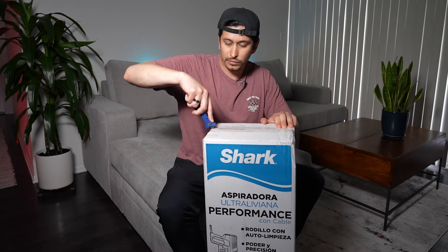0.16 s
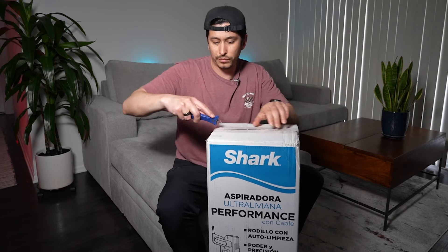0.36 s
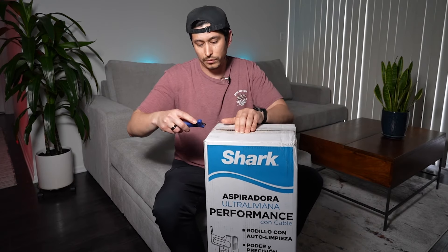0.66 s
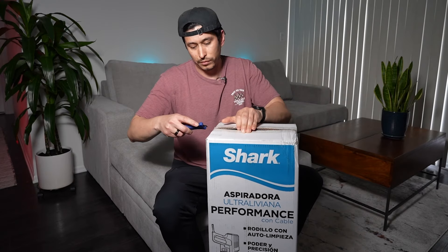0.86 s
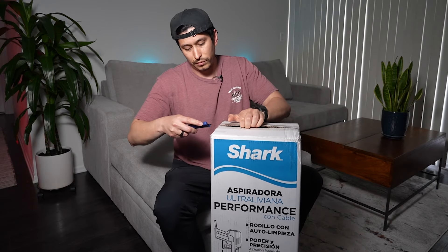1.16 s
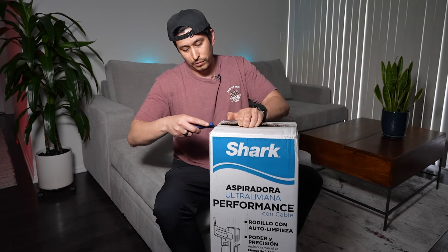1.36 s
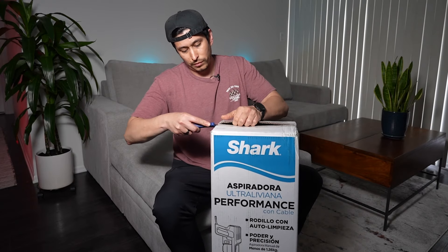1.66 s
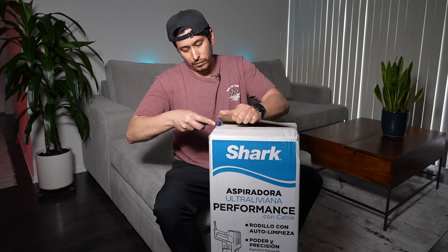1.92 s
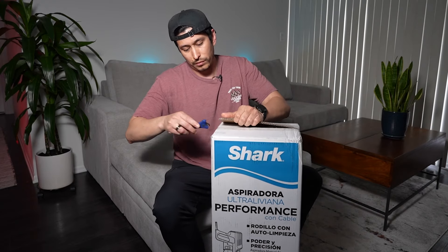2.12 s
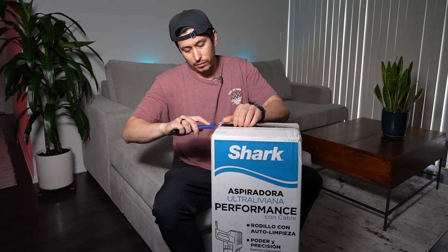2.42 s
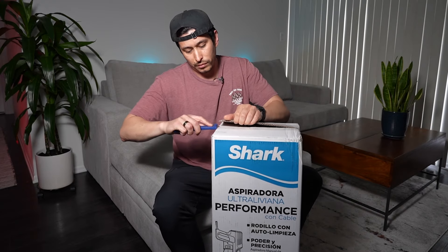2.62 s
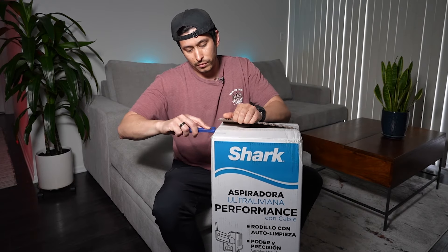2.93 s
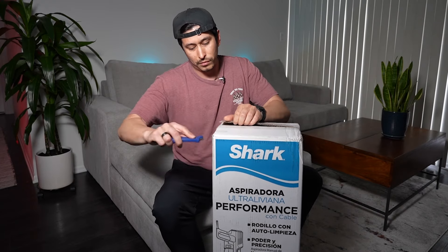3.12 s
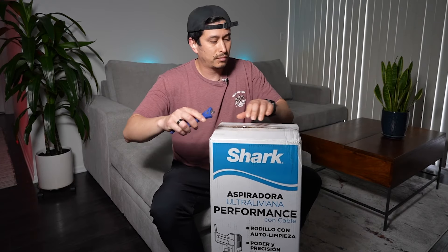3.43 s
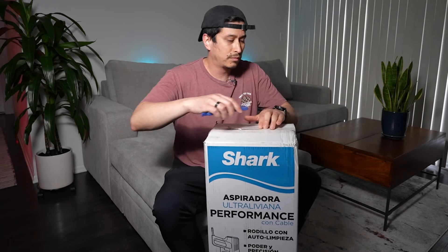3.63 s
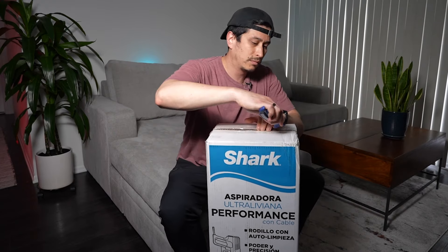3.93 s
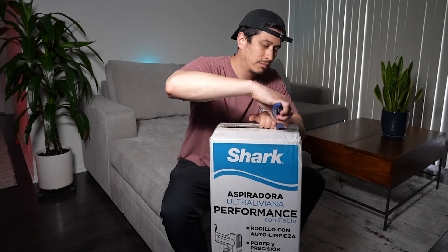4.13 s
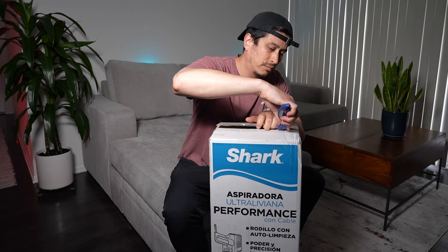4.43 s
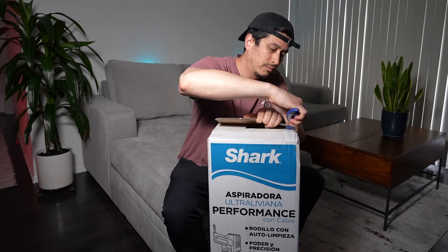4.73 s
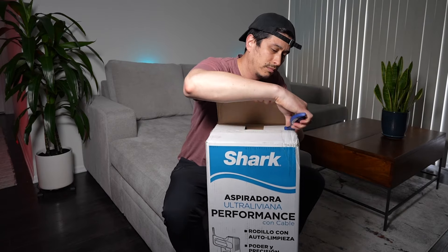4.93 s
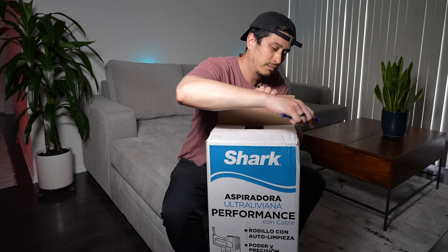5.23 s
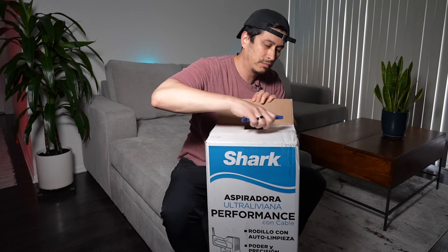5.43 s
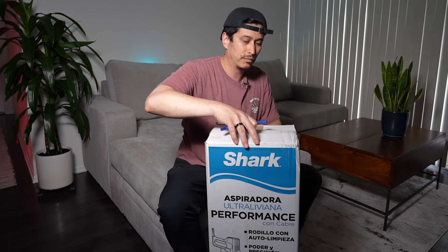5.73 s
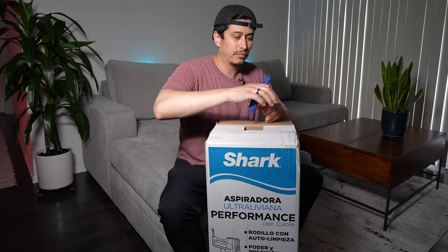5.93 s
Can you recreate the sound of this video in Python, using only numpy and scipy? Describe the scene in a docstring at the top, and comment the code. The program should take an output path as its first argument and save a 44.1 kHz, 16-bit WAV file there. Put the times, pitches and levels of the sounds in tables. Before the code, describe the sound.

Close indoor unboxing: short dry strokes of hand and blade on cardboard, tiny crisp clicks, and brief gritty tears of tape. The loudest moment is a single hard pop with a hollow panel ring early on; later come a burst of ripping with low box thuds, several hollow knocks, a second smaller pop, and finally gentle flap scuffs. The living room answers softly over a low, even background hush.

```python
"""Box cutter on a taped cardboard box

Strokes over the hollow box and short rips are stick-slip noise through board, paper and tape filters.
Blade ticks are millisecond noise bursts; knocks are decaying sines with a ring of the box.
Twice taut tape snaps: a loud crack, the ringing of the freed panel and an answer from the living room.
Diffuse reverberation and steady room tone surround it; the nearby microphone overloads softly."""
import sys
import numpy as np
from scipy import signal
from scipy.fft import rfft, irfft, next_fast_len
from scipy.io import wavfile
from scipy.ndimage import uniform_filter1d, map_coordinates

SR = 44100
rng = np.random.default_rng(int(sys.argv[2]) if len(sys.argv) > 2 else 0)


def store_wav(level_fs):
    """Save 16-bit WAV to argv[1]."""
    pcm = np.round(np.clip(np.atleast_2d(level_fs), -1, 1) * 32767)
    wavfile.write(sys.argv[1], SR, pcm.T.astype(np.int16))


N = 267687
TIME = np.arange(N) / SR  # seconds
AGE = TIME[:SR // 4]  # seconds since a contact

# strokes of blade, hand or flap over the box:
# start_s, length_s, board_level_db, paper_rasp_level_db, tape_hiss_level_db, most_rung_pitch_hz
STROKES = [(-0.02, 0.068, -43, -49.5, -54, 854), (0.263, .14, -61, -66.5, -66.5, 855),
           (0.563, 0.13, -63.5, -63, -66, 1500), (0.79, 0.088, -61, -65, -69, 1820),
           (0.884, 0.099, -53, -63, -63.5, 950), (0.998, 0.077, -51, -61.5, -70, 740),
           (1.08, 0.13, -58.5, -67, -73.5, 510), (1.2, 0.08, -67, -64, -64, 1200),
           (1.291, 0.097, -62.5, -61.5, -70.5, 1400), (1.5, 0.096, -61, -65.5, -67.5, 1650),
           (1.635, 0.11, -62.5, -64.5, -68.5, 1370), (2.08, 0.12, -64.5, -75, -74, 1460),
           (2.211, 0.18, -63.5, -67, -70.5, 1435), (2.49, 0.059, -76.5, -65.5, -74, 1607),
           (2.559, .1, -66, -76, -97, 1717), (2.787, 0.08, -53.5, -61, -68, 1980),
           (2.936, 0.27, -48.5, -55.5, -60, 810), (3.271, 0.2, -60, -74.5, -67.5, 2130),
           (3.681, 0.15, -61.5, -67, -70.5, 1670), (3.874, 0.11, -58.5, -69, -68.5, 690),
           (3.984, 0.2, -63, -65.5, -64, 1290), (4.307, .11, -61, -68, -77.5, 770),
           (4.521, .11, -57, -69, -74, 800), (4.655, 0.17, -59, -65.5, -68.5, 1760),
           (5.291, 0.12, -70.5, -80, -85, 1564), (5.455, 0.12, -68, -75.5, -74, 775),
           (5.584, 0.14, -60, -68, -65, 2000), (5.788, .11, -53, -63, -64, 1500),
           (5.933, 0.086, -65.5, -53.5, -55.5, 864)]
# short rips and scuffs: middle_s, half_length_s, board_level_db, paper_rasp_level_db, tape_hiss_level_db
RIPS = [(0.056, 0.017, -48, -58, -62), (0.089, 0.0012, -38, -40, -44.5), (.539, 0.0023, -43, -40.5, -47),
        (0.616, 0.0094, -69, -46, -54.5), (.657, 0.0011, -56, -41, -55), (.667, .001, -71, -39, -53.5),
        (2.861, 0.0044, -45, -50.5, -60), (2.977, 0.005, -33.5, -37.5, -42.5),
        (3.018, 0.0088, -29, -38, -46), (3.13, 0.022, -39.5, -49.5, -50),
        (3.144, 0.0032, -30.5, -40, -48.5), (3.422, 0.0021, -31.5, -33, -39.5),
        (3.715, .013, -41, -58, -66.5), (4.47, 0.006, -48.5, -60, -56.5), (4.568, 0.004, -72, -55.5, -56),
        (4.737, 0.0031, -55, -50, -58), (4.79, 0.0056, -57, -50, -58), (4.928, 0.0059, -52, -47.5, -53)]
# tape snaps: start_s, crack_gain_db, crack_t60_s, board_delay_s, panel_bass_limit_hz, echo_level_db
SNAPS = [(1.82, -12, 0.0065, .0006, 245.8, -33), (4.9464, -21.5, 0.0069, .0005, 160.2, -33)]
# modes of the panel freed by the first snap, then by the second: pitch_hz, level_db, t60_s
FIRST_PANEL = [(251, -17, 0.0095), (518.4, -0.5, 0.0093), (746, -12, 0.01305), (1250, -15, 0.0076),
               (1610, -10, 0.0065), (2500, -21.5, 0.01)]
SECOND_PANEL = [(200, -8, 0.015), (555, 1, 0.0089), (700, -8, 0.018), (1140, -6, 0.0073),
                (1674, -6.5, 0.011), (2060, -12, 0.01), (2710, -15, 0.0078), (3250, -14, 0.0076)]
# colour that the first snap, then the second, throws into the room: frequency_hz, gain_db
FIRST_ECHO = [(60, -11), (130, -11), (200, -3), (400, -0.5), (650, -3.5), (1000, -10), (2000, -22),
              (4300, -27.5), (6500, -24.5), (10000, -27.5), (16000, -36.5)]
SECOND_ECHO = [(60, -4.5), (120, -10), (190, 1), (280, -2), (680, -3), (880, -12.5), (1200, -8.5),
               (1700, -8), (2300, -21), (4300, -31.5), (7000, -26.5), (15000, -29.5)]
# knocks on the box: start_s, peak_level_db, most_rung_pitch_hz
KNOCKS = [(0.093, -37, 160), (0.533, -38.5, 152), (0.806, -34, 820), (.926, -38.5, 417), (1.052, -34, 357),
          (1.533, -45.5, 254), (1.615, -42, 820), (2.127, -49, 229), (2.275, -40.5, 1010),
          (2.374, -39, 887), (3.14, -28, 230), (3.637, -41, 758), (3.702, -28, 305), (3.726, -23, 610),
          (3.793, -36, 590), (3.884, -40, 342), (4.309, -41.5, 329), (4.341, -44, 190), (4.515, -37, 358),
          (4.542, -42.5, 307), (4.576, -35, 300), (4.675, -31.5, 780), (5.628, -47, 882),
          (5.696, -41.5, 279), (5.816, -42.5, 590), (5.876, -42, 1470), (2.242, -49.5, 300)]
# the box rocks and its walls flex: start_s, level_db, pitch_hz, t60_s
BUMPS = [(3.016, -30, 85.5, 0.085), (3.141, -32.5, 66, 0.077), (3.423, -28.5, 54, 0.11)]
# sharp ticks of blade and tape: start_s, crack_peak_level_db, handle_relative_to_crack_db
TICKS = [(0.0167, -25, -29), (0.039, -21.5, -35), (0.5871, -38, 1.5), (0.8067, -37, -1),
         (1.525, -40.5, -31), (2.226, -41, -8), (2.2767, -33.5, -11), (2.376, -31, -0.5),
         (2.5802, -39, -0.5), (2.6224, -36, -30), (2.6604, -37.5, -37), (2.7955, -49, 1), (2.94, -37, -25),
         (2.957, -34, -21), (3.0074, -37, 7), (3.0191, -19.5, -21), (3.108, -29, -23), (3.3308, -38.5, -25),
         (3.4105, -20.5, -27), (3.8124, -40.5, -4), (3.9451, -48.5, 9), (4.3386, -45.5, -25),
         (4.3934, -31, -25), (4.4874, -32.5, -25), (4.7518, -39, -19), (4.803, -32.5, -23),
         (4.851, -41, -2), (5.351, -51, 3)]
# resonances of the hollow box: pitch_hz, width_hz, gain_db
BOX_MODES = [(94.44, 110, 0.5), (222, 115, 4.5), (349, 130, 3.5), (487, 61, 4), (615.4, 155, 0.5),
             (786, 150, -0.5), (960, 120, -14)]
# resonances of the plastic cutter handle: pitch_hz, width_hz, gain_db
HANDLE_MODES = [(1130, 1300, 3), (1683, 1500, -3.5), (2600, 110, -12), (3260, 480, -13)]
# colour of the rasping paper face: frequency_hz, gain_db
PAPER_COLOUR = [(500, -35.5), (800, 3.5), (1050, 0), (1600, -6), (2100, -7), (3000, -12.5), (4200, -25),
                (7000, -45.5)]
# colour of tape hiss in a rip: frequency_hz, gain_db
RIP_HISS_COLOUR = [(2000, -44), (4300, -11.5), (6000, -8.5), (8200, -4.5), (10500, -8.5), (13000, -18),
                   (16000, -30)]
# colour of skin over smooth tape: frequency_hz, gain_db
SWISH_COLOUR = [(2500, -30.5), (4300, -9.5), (6500, 1.5), (9000, 0), (12000, -2.5), (15500, -6.5)]
# colour of sharp contacts: frequency_hz, gain_db
CRACK_COLOUR = [(500, -25), (2800, -2.5), (4400, -11), (6100, 3), (8300, 8.5), (11000, 2), (16000, -5)]
# decay of the room: frequency_hz, t60_s
ROOM_DECAY = [(100, .55), (400, 0.57), (1500, 0.63), (4000, 0.61), (8000, 0.55), (15000, 0.3)]
# colour of the echo from the walls: frequency_hz, gain_db
WALL_COLOUR = [(60, -4.5), (200, -1), (500, -4.5), (1500, -6.5), (4000, -5), (8000, -8), (15000, -9)]
# colour of the room tone: frequency_hz, gain_db
AIR_COLOUR = [(20, -2.5), (60, -4), (200, -17.5), (600, -16), (1500, -20.5), (3000, -28), (8000, -31.5),
              (16000, -41)]

ATTACK_S, RELEASE_T60_S = 0.03, 0.092  # pressure builds up, then the hand lifts off
WAVER_DB, WAVER_PER_S = 2.5, 30  # uneven pressure: scatter, random knots a second
SPOT_SHARPNESS, SPOT_DB = 6.7, 1.5  # rubbed patch of board: pitch over width, level against the plain rasp
CRACKLES_PER_S, CRACKLE_RANGE_DB = 19, (6, 23.5)  # tape crinkles: mean rate, peak over the hiss rms
KNOCK_CYCLES = 15  # cycles until a knocked spot has fallen by 60 dB
ROOM_DB, RIP_ROOM_DB = -13, -11.5  # room level of handling, and of rips, which face away from the microphone
TOP_HZ = 16000  # upper band limit


def sliding():
    """Stick-slip friction: fibres catch and let go, driving the box, its paper face and the finer tape."""
    rub = slips(rate=300, spread_db=5, smooth=0.5)
    glide = slips(rate=2300, spread_db=6, smooth=1.3)
    board = unit(resonate(rub, BOX_MODES))
    paper = unit(coloured(rub + glide, PAPER_COLOUR))
    tape = unit(coloured(glide, SWISH_COLOUR)) + crinkle()
    out = np.zeros(N)
    for start, length, board_db, paper_db, tape_db, hz in STROKES:
        force = pressure(length)
        first = round(start * SR)
        now = (first + np.arange(len(force))) % N
        spot = unit(resonate(rub[now], [(hz, hz / SPOT_SHARPNESS, 0)]))
        rasp = unit(paper[now] + amp(SPOT_DB) * spot)
        surfaces = amp(board_db) * board[now] + amp(paper_db) * rasp + amp(tape_db) * tape[now]
        stroke = force * surfaces
        add(out, start, stroke[max(-first, 0):])  # skip what precedes time zero
    return out


def pressure(length):
    """Friction grows with normal force: the hand presses down, holds unevenly and lifts off."""
    age = TIME[:SR // 2]
    rise = np.sin(np.pi / 2 * np.clip(age / ATTACK_S, 0, 1)) ** 2
    release = np.exp(-np.log(1000) * np.maximum(age - length, 0) / RELEASE_T60_S)
    waver = amp(WAVER_DB * wobble(WAVER_PER_S)[:len(age)])
    return rise * release * waver


def crinkle():
    """Impulsive buckling: creased tape gives sparse tiny cracks of random strength."""
    struck = rng.random(N) < CRACKLES_PER_S / SR
    cracks = struck * amp(rng.uniform(*CRACKLE_RANGE_DB, N))
    return signal.fftconvolve(cracks, crest(coloured(burst(0.0029), CRACK_COLOUR)))[:N]


def ripping():
    """Tearing as dense stick-slip: the blade drives board, paper and tape with a burst of catches."""
    power = 0
    for middle, half, *levels_db in RIPS:
        bell = np.exp(-((TIME - middle) / half) ** 2)
        power = power + amp(levels_db)[:, None] ** 2 * bell
    board, paper, tape = np.sqrt(power)
    tear = slips(rate=1200, spread_db=6, smooth=1)
    peel = unit(tear + 2 * slips(rate=2000, spread_db=3, smooth=1.5))
    # each path is scaled by its response to the steady tear
    board_sound = resonate(board * tear, BOX_MODES) / np.std(resonate(tear, BOX_MODES))
    paper_sound = coloured(paper * tear, PAPER_COLOUR) / np.std(coloured(tear, PAPER_COLOUR))
    tape_sound = coloured(tape * peel, RIP_HISS_COLOUR) / np.std(coloured(tear, RIP_HISS_COLOUR))
    return board_sound + paper_sound + tape_sound


def snaps():
    """Release of tension: taut tape parts with a crack and the freed panel rings in decaying modes."""
    out = np.zeros(N)
    panels, colours = [FIRST_PANEL, SECOND_PANEL], [FIRST_ECHO, SECOND_ECHO]
    for (start, crack_db, t60, delay, bass_hz, echo_db), panel, colour in zip(SNAPS, panels, colours):
        snap = amp(crack_db) * coloured(burst(t60), CRACK_COLOUR)
        for hz, db, life in panel:
            add(snap, delay, amp(db) * np.sin(2 * np.pi * hz * AGE) * fade(life))
        snap = radiated(snap, bass_hz)
        add(out, start, snap)
        add(out, start + 0.0088, amp(-24.5) * snap)  # off the nearest surface
        add(out, start, amp(echo_db) * echo(colour))
    return out


def radiated(x, corner_hz):
    """Radiation efficiency: a small panel moves little air at low frequencies."""
    return signal.sosfilt(signal.butter(4, corner_hz, "highpass", fs=SR, output="sos"), x)


def knocks():
    """Impact excitation: each struck spot rings at its own pitch; hard pushes flex the whole box."""
    out = np.zeros(N)
    for start, db, hz in KNOCKS:
        onset = 1 - np.exp(-2 * hz * AGE)
        spot = crest(np.sin(2 * np.pi * hz * AGE) * fade(KNOCK_CYCLES / hz) * onset)
        contact = fade(0.00085) + 0.064 * burst(0.025)
        hollow = crest(resonate(contact, BOX_MODES))
        scuff = crest(coloured(burst(0.026), PAPER_COLOUR))
        add(out, start, amp(db) * crest(spot + 0.5 * hollow + 0.43 * scuff))
    for start, db, hz, t60 in BUMPS:
        add(out, start, -amp(db) * np.sin(2 * np.pi * hz * AGE) * fade(t60))
    return out


def ticks():
    """Impulse response: the blade jumps a notch with a tiny crack and a short ring of the plastic handle."""
    out = np.zeros(N)
    for start, db, handle_db in TICKS:
        crack = crest(coloured(burst(0.0043), CRACK_COLOUR))
        handle = crest(resonate(burst(0.0032), HANDLE_MODES))
        add(out, start, amp(db) * (crack + amp(handle_db) * handle))
    return out


def room(x):
    """Reverberation as convolution: the quieter sounds excite a diffuse tail of unit energy."""
    tail = echo(WALL_COLOUR)
    return signal.fftconvolve(x, tail / np.linalg.norm(tail))[:N]


def echo(colour):
    """Diffuse-field decay: noise of rms 1 before its decay, each frequency dying at its own speed."""
    noise = unit(coloured(rng.standard_normal(SR), colour))
    hz, t, spectrum = signal.stft(noise, SR, nperseg=256)
    decay = np.exp(-np.log(1000) * t / along(ROOM_DECAY, hz)[:, None])
    tail = signal.istft(spectrum * decay, SR, nperseg=256)[1]
    return tail * np.clip(TIME[:len(tail)] / 0.0053, 0, 1) ** 2  # the first walls are a few ms away


def room_tone():
    """Stationary background noise: Gaussian noise shaped by a fixed spectrum."""
    noise = rng.standard_normal(N)
    return amp(-68) * unit(filtered(noise, lambda hz: amp(along(AIR_COLOUR, hz))))


def slips(rate, spread_db, smooth):
    """Stick-slip: uneven catches over smooth friction, levelled to rms 1 over about 18 ms."""
    size_db = spread_db * np.minimum(rng.exponential(size=N), 3.5)
    catches = (rng.random(N) < rate / SR) * amp(size_db) * rng.choice([-1, 1], N)
    friction = unit(catches) + smooth * rng.standard_normal(N)
    return friction / np.sqrt(np.abs(uniform_filter1d(friction ** 2, size=800)) + 1e-9)


def burst(t60):
    """Transient noise: a random puff under exponential decay."""
    return rng.standard_normal(len(AGE)) * fade(t60)


def fade(t60):
    """Exponential damping: amplitude falls by 60 dB in t60 seconds."""
    return np.exp(-np.log(1000) * AGE / t60)


def wobble(rate):
    """Random modulation: a smooth curve through rate random knots a second."""
    return map_coordinates(rng.standard_normal(512), [TIME * rate], mode="wrap")


def resonate(x, modes):
    """Modal superposition: parallel resonances (Hz, width Hz, dB) of alternating sign."""
    def response(hz):
        total = 0
        for k, (centre, width, db) in enumerate(modes):
            damping = 1j * hz * width
            total = total + (-1) ** k * amp(db) * damping / (centre * centre - hz * hz + damping)
        return total
    return filtered(x, response)


def coloured(x, points, size=1024):
    """Minimum-phase filtering: a causal filter with the given (Hz, dB) outline, by folded cepstrum."""
    cepstrum = irfft(np.log(amp(along(points, np.fft.rfftfreq(size, 1 / SR)))))
    cepstrum[1:size // 2] *= 2
    cepstrum[size // 2 + 1:] = 0
    impulse = irfft(np.exp(rfft(cepstrum)))
    return signal.fftconvolve(x, impulse)[:len(x)]


def filtered(x, response):
    """Linear filtering: the spectrum of x times a response of frequency."""
    m = next_fast_len(len(x) + 8192, True)  # padded against wrap-around
    return irfft(rfft(x, m) * response(np.fft.rfftfreq(m, 1 / SR)), m)[:len(x)]


def along(points, hz):
    """Logarithmic frequency scale: interpolate (Hz, value) points on it."""
    f, v = np.transpose(points)
    return np.interp(np.log(hz + 1), np.log(f), v)


def amp(db):
    """Decibel law: level to amplitude gain."""
    return 10 ** (np.asarray(db) / 20)


def unit(x):
    """Effective value: scale to rms 1."""
    return x / np.sqrt(np.mean(x ** 2) + 1e-20)


def crest(x):
    """Peak value: scale to peak 1."""
    return x / (np.abs(x).max() + 1e-20)


def add(track, s, x):
    """Superposition: mix x into the track from time s."""
    part = track[max(round(s * SR), 0):][:len(x)]
    part += x[:len(part)]


def scene():
    """Superposition of direct sound, reverberation and background noise."""
    handling = sliding() + ticks() + knocks()
    rips = ripping()
    reverberation = room(amp(ROOM_DB) * handling + amp(RIP_ROOM_DB) * rips)
    return (handling + rips + reverberation + snaps() + room_tone())[None]


def record(dry):
    """Saturation and band limiting: loud peaks round off below 0.78, then a steep low-pass."""
    clipped = dry[0] / (1 + (dry[0] / 0.78) ** 8) ** (1 / 8)
    return filtered(clipped, lambda hz: 1 / np.sqrt(1 + (hz / TOP_HZ) ** 160))[None]


dry = scene()
out = record(dry)
store_wav(out)
```